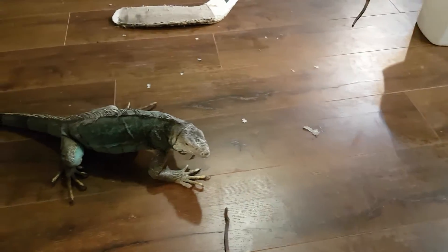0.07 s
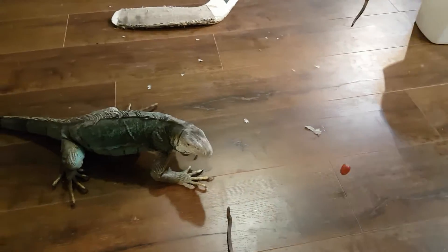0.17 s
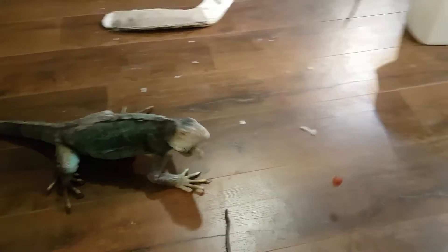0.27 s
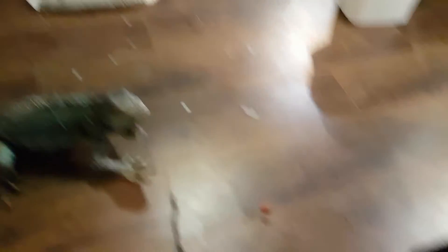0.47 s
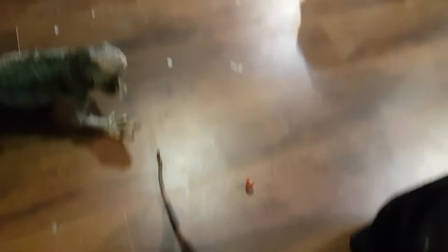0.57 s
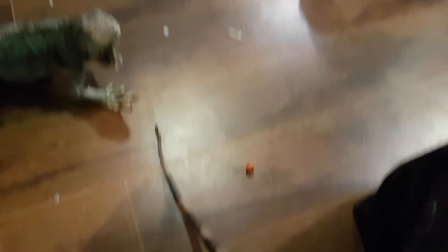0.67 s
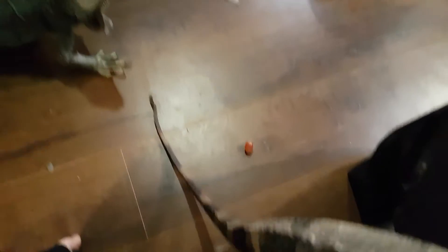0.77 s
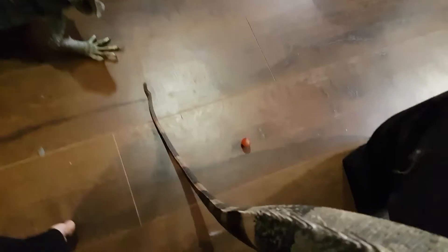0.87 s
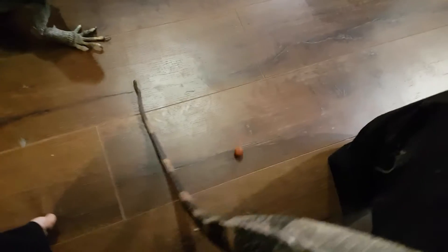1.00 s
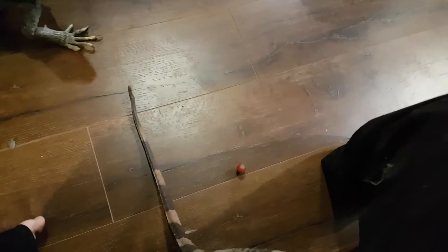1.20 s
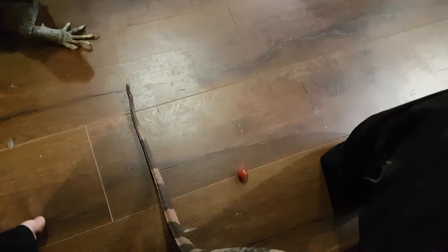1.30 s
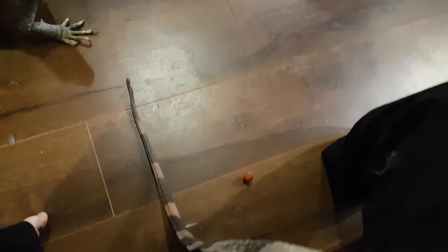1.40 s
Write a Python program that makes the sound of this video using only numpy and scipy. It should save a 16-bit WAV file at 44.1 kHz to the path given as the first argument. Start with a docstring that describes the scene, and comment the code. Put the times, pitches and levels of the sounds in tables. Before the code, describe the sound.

A small soft fruit thumps on a wooden floor and bounces once, amid faint rustling.

```python
"""Living room, wooden floor: a small soft fruit drops close by, thumps and bounces once.
Each landing gives a skin tick, a short low knock of the boards and a brief ring of the room.
A lizard scurries off: faint claw ticks, one light footfall, the dry rustle of sliding scales
and a dull shuffle. Mains hum, low room rumble and thin hiss lie underneath."""
import sys
import numpy as np
from scipy import signal
from scipy.fft import rfft, irfft
from scipy.io import wavfile
from scipy.ndimage import uniform_filter1d

SR = 44100
rng = np.random.default_rng(int(sys.argv[2]) if len(sys.argv) > 2 else 0)


def master(y):
    """Save y as 16-bit WAV."""
    cut = np.clip(np.atleast_2d(y).T, -1, 1)
    pcm = np.round(cut * 32767)  # scale
    wavfile.write(sys.argv[1], SR, pcm.astype(np.int16))


N = 63945
T, HZ = np.arange(N) / SR, np.fft.rfftfreq(N, 1 / SR)

# balance of hiss and room tail: f/Hz, L-R/dB
AIR_PAN = [(700, -5.5), (1800, -0.5), (3200, -8.5), (4300, -3), (6000, -11.5), (8000, -14), (10000, -1.5),
           (15000, -2)]


def amp(db):
    """Decibels to gain."""
    return 10 ** (np.asarray(db) / 20)


def unit(x):
    """Scale to rms 1."""
    return x / np.sqrt(np.mean(x ** 2) + 1e-20)


def read(points, hz=HZ):
    """Interpolate a table over log frequency."""
    f, value = np.transpose(points)
    return np.interp(np.log(hz + 1), np.log(f + 1), value)


def later(x, delay_s):
    """Delay a stereo sound."""
    return np.pad(x, ((0, 0), (round(delay_s * SR), 0)))[:, :N]


def sides(pan_db):
    """Left and right gains for an L-R level difference."""
    return amp(np.array([[.5], [-.5]]) * pan_db)


def swell(middle_s, sigma_s):
    """Gaussian rise and fall."""
    return np.exp(-.5 * ((T - middle_s) / sigma_s) ** 2)


def noise(colour_db, pan_db=0):
    """Diffuse stereo noise, rms 1: sides alike in the bass, narrow peaks and dips from reflections."""
    # left-right coherence: f/Hz, coherence/1
    likeness = [(30, 0.93), (150, 0.86), (300, 0.9), (550, 0.4), (1000, 0.1), (3000, 0.02), (16000, 0.02)]
    left_lag_s, ripple_db, ripple_hz = 0.00018, 2.04, 44.4
    common, separate = rfft(rng.standard_normal((2, N)))
    coherence = read(likeness)
    left = common * np.exp(-2j * np.pi * HZ * left_lag_s)
    right = coherence * common + np.sqrt(1 - coherence ** 2) * separate
    ripple = unit(uniform_filter1d(rng.standard_normal(len(HZ)), int(ripple_hz / HZ[1])))
    gain = amp(colour_db + ripple_db * ripple * (1 - coherence))
    return unit(irfft(np.array([left, right]) * gain * sides(pan_db), N))


def background():
    """Steady mains hum; room rumble and thin hiss drift slowly in level."""
    # hum tones: f/Hz, rms level/dB
    tones = [(50, -54), (100.5, -54.5), (150.5, -52), (292, -57), (605, -67.5)]
    # rumble spectrum: f/Hz, relative density/dB
    rumble_colour = [(20, -22), (45, -19), (78, -15.5), (115, -4), (160, 2), (200, -3.5), (310, -2),
                     (410, -3), (480, -12.5), (600, -16), (800, -23), (1500, -34), (4000, -83)]
    # rumble balance: f/Hz, L-R/dB
    rumble_pan = [(100, 0.7), (350, -2.5), (550, -5.5), (800, -8.5)]
    # rumble envelope: t/s, level/dB
    rumble_level = [(0, -44), (0.4, -44), (0.6, -41.5), (0.77, -43), (0.95, -43), (1.2, -45), (1.45, -43.5)]
    # hiss spectrum before its low cut: f/Hz, relative density/dB
    hiss_colour = [(700, -7.5), (1100, -4), (1350, -10), (1700, -8), (2700, -13.5), (3600, -17),
                   (4600, -21), (6500, -32), (8000, -28), (9300, -34.5), (12000, -30), (15500, -30)]
    # hiss envelope: t/s, level/dB
    hiss_level = [(0, -57.5), (0.5, -54.5), (0.9, -56), (1.45, -56.5)]
    hum = sum(amp(db) * np.sqrt(2) * np.sin(2 * np.pi * (hz * T + rng.random())) for hz, db in tones)
    rumble = noise(read(rumble_colour), read(rumble_pan))
    rumble *= amp(np.interp(T, *np.transpose(rumble_level)))
    low_cut_db = -10 * np.log10(1 + (670 / (HZ + 1)) ** 2)
    hiss = noise(read(hiss_colour) + low_cut_db, read(AIR_PAN))
    hiss *= amp(np.interp(T, *np.transpose(hiss_level)))
    return hum + rumble + hiss


def slides():
    """Scaly skin slides over the boards in soft, grainy strokes."""
    # strokes: middle t/s, sigma/s, level/dB, centre f/Hz, half width/octaves
    strokes = [(0.042, 0.04, -69.5, 7900, 0.63), (0.79, 0.013, -56.5, 3500, 0.36),
               (0.876, 0.012, -58, 3270, 0.15), (0.935, 0.083, -57.5, 2920, 1),
               (0.945, 0.01, -58, 5400, 0.15), (0.988, 0.041, -67, 6000, 0.7),
               (1.105, 0.036, -62, 4170, 0.15), (1.248, 0.06, -56.5, 3420, 0.46),
               (1.39, 0.054, -58, 3500, 0.38)]
    # rustle balance: f/Hz, L-R/dB
    pan = [(1000, -2), (2200, -20), (3200, -11.5), (4300, -6.5), (6000, -15), (9000, -10)]
    grain_db, grain_s = 1.5, 0.0067
    out = np.zeros((2, N))
    for middle_s, sigma_s, db, centre_hz, width_oct in strokes:
        offset = np.log2((HZ + 1) / centre_hz) / width_oct
        colour_db = -20 * np.log10(1 + offset ** 2 + np.maximum(offset, 0) ** 4)  # steeper above centre
        grain = unit(uniform_filter1d(rng.standard_normal(N), int(grain_s * SR)))
        out += noise(colour_db, read(pan)) * amp(db + grain_db * grain) * swell(middle_s, sigma_s)
    return out


def claws():
    """Claws tick on the wood: faint noise bursts with a short room tail."""
    # claw ticks: t/s, level/dB, decay/s, tilt/(dB per octave)
    ticks = [(0.0348, -48, 0.0021, -10), (0.0568, -45, 0.0017, -15), (0.0617, -58, 0.001, 18),
             (0.141, -57, 0.00079, 11), (0.5360, -49, 0.002, -1), (0.541, -51, 0.0043, -1.5),
             (0.721, -65, 0.0018, 5), (0.7696, -61, 0.0029, 10), (0.784, -59, 0.005, 2),
             (1.0958, -66, 0.0027, -3), (1.1183, -57, 0.0041, -7)]
    # tick spectrum before tilt: f/Hz, relative density/dB
    colour = [(500, -20.5), (1500, -0.5), (3000, 1), (4900, 1), (6500, -11), (10000, -17), (16000, -24)]
    tail_s, tail_db = 0.033, -11.5
    octaves = np.log2(np.maximum(HZ, colour[0][0]))
    out = np.zeros((2, N))
    for start_s, db, decay_s, tilt_db in ticks:
        envelope = np.exp(-T / decay_s) + amp(tail_db) * np.exp(-T / tail_s)
        burst = noise(read(colour) + tilt_db * octaves, pan_db=-7)
        out += later(amp(db) * envelope * burst, start_s)
    return out


def ring(modes):
    """Decaying sines from rows of f/Hz, level/dB, t60/s."""
    return sum(amp(db - 60 * T / t60_s) * np.sin(2 * np.pi * hz * T) for hz, db, t60_s in modes)


def knock(contact_s):
    """Struck boards ring; low bending waves arrive last, and a longer contact dulls the blow."""
    # board modes: f/Hz, level/dB, t60/s
    modes = [(163.6, -17, 0.069), (217.6, -11, 0.048), (285.9, -6, 0.098), (388, -12.5, 0.037),
             (579, -4.5, 0.015), (1190, -21, 0.032)]
    # reflections off nearby furniture: delay/s, level/dB
    reflections = [(0.00534, -8.6), (0.0117, -11.5)]
    # knock balance: f/Hz, L-R/dB
    pan = [(150, 1), (350, -2), (600, -2.5), (1200, -7)]
    bend_s, bend_hz = 0.0011, 320  # group delay bend_s at bend_hz
    left_lag_s, low_cut_hz = 0.00029, 231
    dispersion = np.exp(-4j * np.pi * bend_s * np.sqrt(bend_hz * HZ))
    echoes = 1 + sum(amp(db) * np.exp(-2j * np.pi * HZ * delay_s) for delay_s, db in reflections)
    stereo = sides(read(pan)) * np.exp(-2j * np.pi * HZ * np.array([[left_lag_s], [0]]))
    wave = irfft(rfft(ring(modes)) * dispersion * echoes * stereo, N)
    wave *= T < T[-1] / 2  # drop FFT wrap-around
    wave = signal.sosfilt(signal.butter(2, low_cut_hz, "high", fs=SR, output="sos"), wave)
    return irfft(rfft(wave) / (1 + 1j * HZ * contact_s) ** 2, N)


def footfall():
    """One light step of the lizard knocks the boards."""
    return later(amp(-39) * knock(contact_s=0.0004), delay_s=0.0566)


def fruit():
    """Drop and bounce: each a skin tick, a knock of the boards and the room's answer."""
    # landings: t/s, gain/dB, contact/s, tick level/dB, room send/dB
    landings = [(0.2110, 0.5, 0.002, -39.5, 3), (0.4678, -9.5, 0.0031, -66, -9)]
    # skin tick spectrum: f/Hz, relative density/dB
    tick_colour = [(300, 4), (1500, 3.5), (3000, -1.5), (5000, -12.5), (8500, 0.5), (12000, -20),
                   (16000, 1)]
    tick_decay_s = 0.0018
    out = np.zeros((2, N))
    for start_s, db, contact_s, tick_db, room_db in landings:
        tick = amp(tick_db) * noise(read(tick_colour), pan_db=-6) * np.exp(-T / tick_decay_s)
        thump = amp(db) * (knock(contact_s) + amp(room_db) * room())
        out += later(tick + thump, start_s)
    return out


def room():
    """The room rings: a diffuse tail, each band dying at its own rate, plus standing waves."""
    # tail spectrum: f/Hz, relative density/dB
    colour = [(50, -35.5), (130, 4.5), (300, 2), (450, 0), (680, -13), (1000, -12.5), (1300, -18.5),
              (1800, -33), (3100, -24), (4500, -44), (9000, -48.5), (16000, -55)]
    # tail decay: f/Hz, t60/s
    t60 = [(150, 0.33), (600, 0.48), (1100, 0.48), (3000, 0.26), (10000, 0.17)]
    # standing waves: f/Hz, level/dB, t60/s
    modes = [(171, -32.5, 0.49), (284.7, -28.5, 0.31), (508, -43.5, 0.28), (620, -43.5, 0.4),
             (685.5, -42.5, 0.29), (768, -53, 0.66)]
    tail_gain_db, rise_s = -29, 0.0056
    pan_db = read(AIR_PAN) * HZ / (HZ + 670)  # bass centred
    hz, t, bands = signal.stft(noise(read(colour), pan_db), SR, nperseg=512)
    decay = amp(-60 * t / read(t60, hz)[:, None])
    tail = signal.istft(bands * decay, SR, nperseg=512)[1][:, :N]
    build_up = 1 - np.exp(-(T / rise_s) ** 2)
    return (amp(tail_gain_db) * tail + ring(modes)) * build_up


def shuffle():
    """A dull shuffle on the floor: one swell of low noise."""
    # shuffle spectrum: f/Hz, relative density/dB
    colour = [(25, -20), (50, 9), (75, -19), (110, 4.5), (220, -10.5), (320, -4.5), (500, -24), (1200, -48),
              (4000, -90)]
    return amp(-43) * swell(middle_s=0.77, sigma_s=0.08) * noise(read(colour))


def scene():
    """Fruit and lizard over the background, in stereo."""
    return fruit() + claws() + slides() + footfall() + shuffle() + background()


def record(dry):
    """Steep low-pass band limit."""
    cutoff_hz = 15900
    low_pass = signal.firwin(511, cutoff_hz, window=("kaiser", 9), fs=SR)
    return signal.oaconvolve(dry, low_pass[None], "same")


dry = scene()
out = record(dry)
master(out)
```